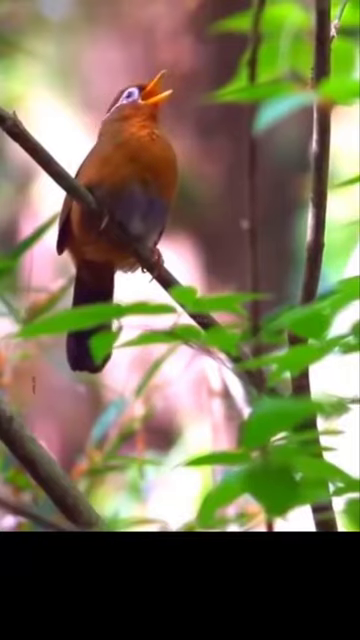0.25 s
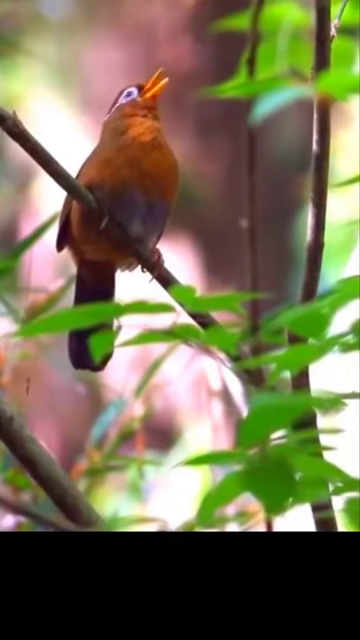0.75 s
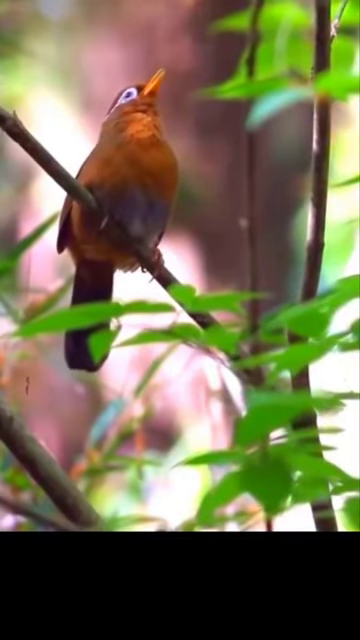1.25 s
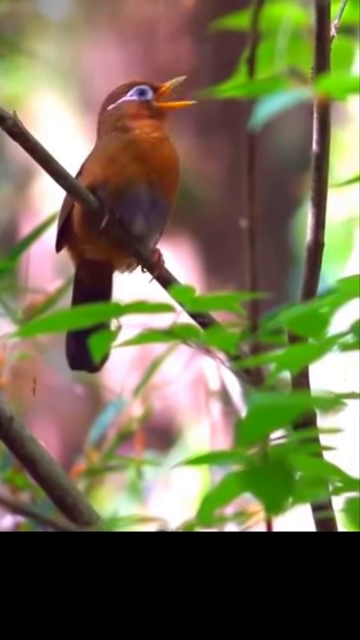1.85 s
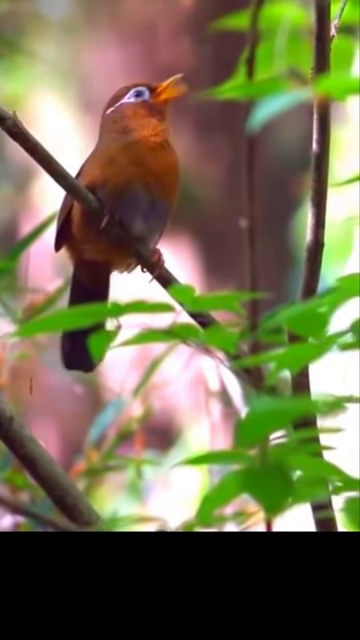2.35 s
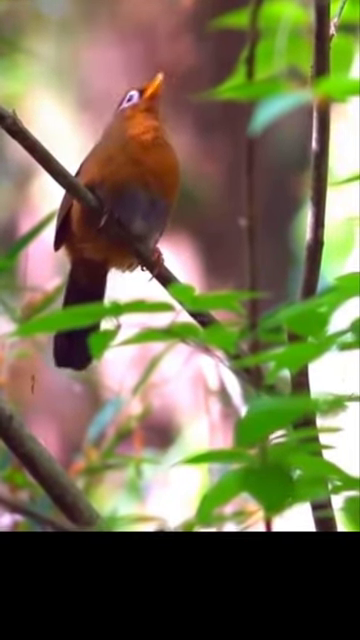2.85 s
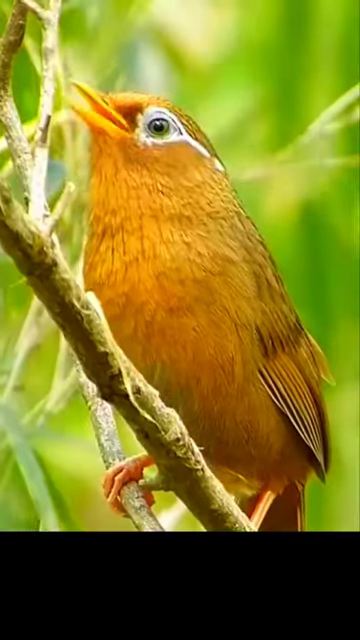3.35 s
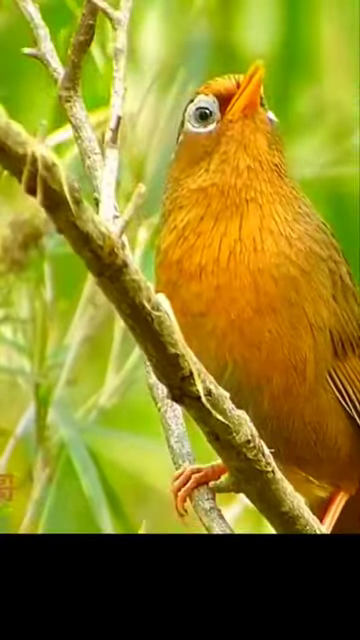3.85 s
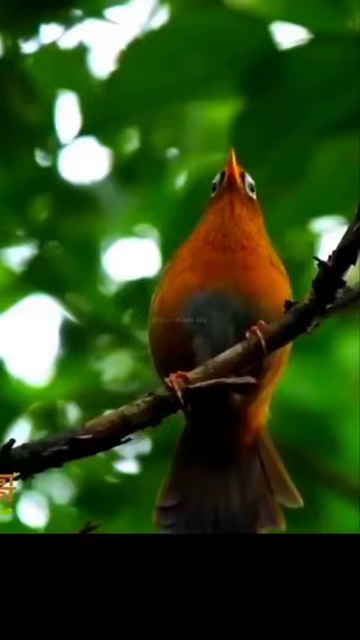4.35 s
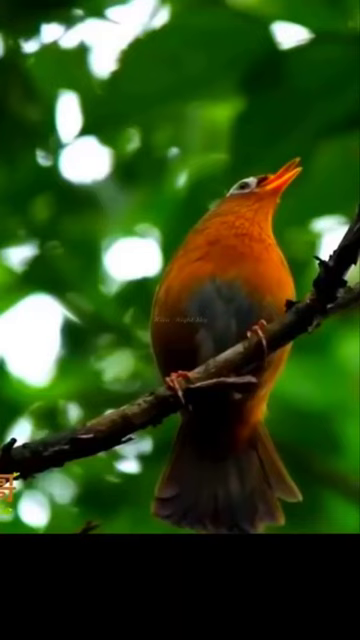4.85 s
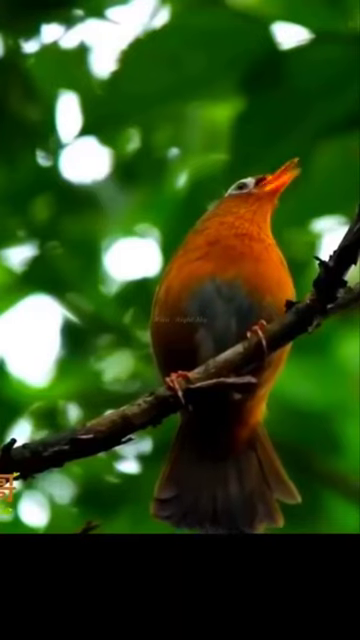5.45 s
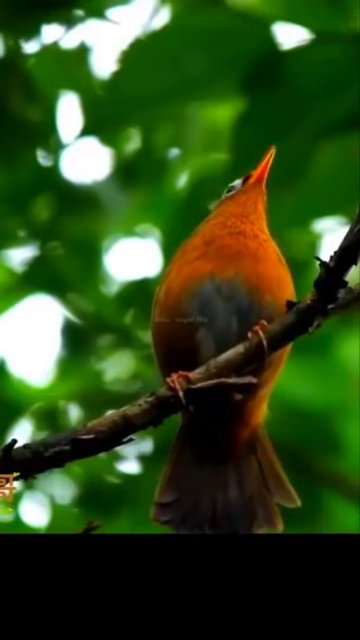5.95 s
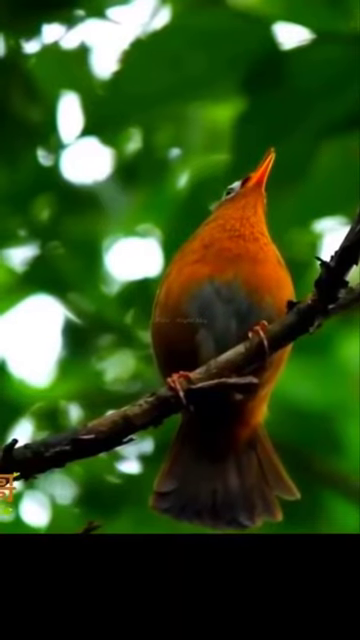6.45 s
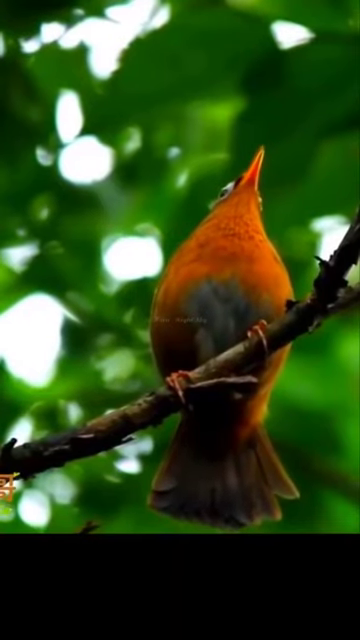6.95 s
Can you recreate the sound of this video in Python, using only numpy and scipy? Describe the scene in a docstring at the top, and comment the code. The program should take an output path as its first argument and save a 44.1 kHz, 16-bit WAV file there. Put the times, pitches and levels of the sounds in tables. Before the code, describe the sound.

Clear rising bird whistles mix with buzzing arched notes, thin to two tiny chips, then resume as rippling slurs and quick warbling chatter among trees.

```python
"""Scooped whistles and buzzy arches open a hwamei's song in a wood, heard from three spots in turn.
Two faint zigzag chips follow and ring on, then falling slurs and warbles, with rattles to close their runs.
Each kind of syllable has its own rule for pitch and level; a near-sine voice, often trilled fast, sings it.
Sparse random echoes make the wood. Behind lie faint clear peeps, soft noise hoots,
far thumps of decaying low rumble, and a hush of shaped background noise."""
import sys
import numpy as np
from scipy import signal
from scipy.fft import rfft, irfft, next_fast_len
from scipy.io import wavfile
from scipy.ndimage import uniform_filter1d

SR = 44100
rng = np.random.default_rng(int(sys.argv[2]) if len(sys.argv) > 2 else 0)


def generate_wav(sig):
    """Save sig (samples, or channels by samples) to the path in sys.argv[1] as 16-bit PCM at SR."""
    pcm = np.round(np.clip(np.atleast_2d(sig).T, -1, 1) * 32767).astype(np.int16)
    wavfile.write(sys.argv[1], SR, pcm)


N = 317079
TIME = np.arange(N) / SR  # s

# when each of the three spots is heard: (from [s], to [s])
SPOTS = [(-.1, 3.2), (3.24, 3.807), (4.43, 7.3)]
# how the throat colours the song at the first and the third spot: (frequency [Hz], gain [dB])
FIRST_COLOUR = [(1000, -55), (1400, -21), (1650, 4), (4400, 1), (4900, -7), (5800, -2), (7200, 6.5),
                (13000, 10.5), (15600, -11.5)]
THIRD_COLOUR = [(1050, -58), (1500, -14.5), (2400, 3.5), (3500, 0), (4200, 2), (5200, -5), (8500, 0),
                (12200, 8), (14000, -3)]


def song():
    """The three stretches of song, each with its own echo; syllable levels are set before echo and colour."""
    whistles = sing(whistle, WHISTLES, WHISTLE_OVERTONES_DB, trill=0.069, trill_hz=119.8, held_hz=2495,
                    jitter=0.008, flutter=5.2, rasp_db=-5.5, rasp_hz=2200, split_db=-24.5)
    buzzes = sing(buzz, BUZZES, BUZZ_OVERTONES_DB, trill=0.078, trill_hz=124.1,
                  jitter=0.0047, flutter=2.4, rasp_db=-8.5, rasp_hz=9000)
    chips = sing(chip, CHIPS, CHIP_OVERTONES_DB, jitter=0.0081)
    slurs = sing(slur, SLURS, SLUR_OVERTONES_DB, trill=0.0092, trill_hz=54.83,
                 jitter=.004, flutter=4.3, split_db=-13.5)
    warbles = sing(warble, WARBLES, WARBLE_OVERTONES_DB, trill=0.012, trill_hz=90.0,
                   jitter=0.0085, flutter=9.4)
    rattles = sing(rattle, RATTLES, WARBLE_OVERTONES_DB, trill=0.085, trill_hz=200.0,
                   held_hz=3030, flutter=1.8)

    # the buzzes get stronger near echoes than the whistles
    first = wood(whistles, near_db=-15, near_t60=.1, far_db=-13.5)
    first += wood(buzzes, near_db=-4.0, near_t60=0.055, far_db=-13.5)
    second = wood(amp(-9.0) * chips, near_db=-4.0, near_t60=0.21, far_db=-16.5)
    phrase = slurs + amp(-0.84) * warbles + amp(-2.5) * rattles
    third = wood(phrase, near_db=-1.5, near_t60=0.13, far_db=-15)

    spots = coloured(first, FIRST_COLOUR), second, coloured(third, THIRD_COLOUR)
    return sum(heard(x, span) for x, span in zip(spots, SPOTS))


SCOOP_S, SCOOP_BEND, SCOOP_ATTACK_S = .05, 1.4, 0.046
SCOOP_START_DB, SCOOP_DB, CATCH_DB, LOCK_S = -18, -8.5, -14, 0.0024
FLICK_S, FLICK_SINK_S, FLICK_FALL_S, FLICK_END_DB = .012, .024, 0.022, -10.5
# overtones 2, 3, .. of the whistles: level against the fundamental, before the note's force [dB]
WHISTLE_OVERTONES_DB = [-30.5, -41.5, -65.5, -54.5, -62.5]
# brief dips in the level of a held note: (time [s], half width [s], depth [dB])
DIPS = [(1.597, .016, -11.5), (1.857, 0.0064, -4.5)]
# whistles: (start [s], held from [s], flick [s], low pitch [Hz], held pitch [Hz],
#            pitch at the end of the hold [Hz], flick pitch [Hz], level [dB], swell over the hold [dB])
WHISTLES = [ (-.04, 0.015, .113, 2015, 2292, 2412, 2908, -29.5, 9.5),
            (0.184, 0.236, .333, 1850, 2418, 2540, 3065, -18.5, 0),
            (0.677, 0.748, .873, 1720, 2450, 2525, 3056, -21, 3.5),
            (.925, 0.989, 1.092, 2100, 2455, 2660, 2988, -18.5, 2),
            (1.448, 1.526, 1.662, 1828, 2387, 2349, 3150, -22.5, 1),
            (1.725, 1.788, 1.929, 1987, 2416, 2473, 3160, -20, 0.5),
            (2.33, 2.423, 2.543, 1954, 2379, 2518, 3350, -23, 4),
            (2.618, 2.714, 2.868, 2032, 2368, 2462, 2635, -23.5, 3.5), ]


def whistle(start, lock, flick, low_hz, held_hz, until_hz, flick_hz, db, swell_db):
    """A soft scoop catches, locks onto a loud held note, drifts in pitch and ends in a flick."""
    end = flick + FLICK_FALL_S
    t = between(start, end)
    scoop = ramp(t, lock, lock - SCOOP_S) ** SCOOP_BEND
    hold = ramp(t, lock, flick)
    hz = held_hz + (low_hz - held_hz) * scoop + (until_hz - held_hz) * hold
    flick_width = np.where(t < flick, FLICK_S, FLICK_SINK_S)
    hz += (flick_hz - until_hz) * np.exp(-abs(t - flick) / flick_width)
    # the level drops at the catch, just before the lock
    times = [start, start + SCOOP_ATTACK_S, lock - 2 * LOCK_S, lock - LOCK_S, lock, flick - FLICK_S, end]
    levels = [SCOOP_START_DB, SCOOP_DB, SCOOP_DB, CATCH_DB, 0, 0, FLICK_END_DB]
    shape = np.interp(t, times, levels)
    dips = sum(depth * np.exp(-((t - s) / width) ** 2) for s, width, depth in DIPS)
    return t, hz, db + swell_db * hold + shape + dips


BUZZ_BEND, BUZZ_START_DB, BUZZ_RELEASE_S, BUZZ_END_DB = 1.8, -5.5, 0.052, -8
BUZZ_LEAD_S, BUZZ_LEAD_DB, BUZZ_ATTACK_S = .02, -20.5, .006  # a faint lead-in before each
# overtones 2, 3, .. of the buzzes: level against the fundamental, before the note's force [dB]
BUZZ_OVERTONES_DB = [-32.5, -35.5, -30.5]
# buzzes: (start [s], crest [s], end [s], start pitch [Hz], crest pitch [Hz], end pitch [Hz], level [dB])
BUZZES = [(0.403, 0.485, .63, 3700, 4090, 2550, -19), (1.161, 1.239, 1.371, 3740, 4186, 2701, -16),
          (2.03, 2.095, 2.25, 3990, 4148, 2875, -19)]


def buzz(start, crest, end, start_hz, crest_hz, end_hz, db):
    """A high arch that grows louder as it bends over and dives, then lets go."""
    t = between(start - BUZZ_LEAD_S, end)
    climb = (start_hz - crest_hz) * ramp(t, crest, start) ** BUZZ_BEND
    dive = (end_hz - crest_hz) * ramp(t, crest, end) ** BUZZ_BEND
    shape = np.interp(t, [start - BUZZ_ATTACK_S, start, end - BUZZ_RELEASE_S, end],
                      [BUZZ_LEAD_DB, BUZZ_START_DB, 0, BUZZ_END_DB])
    return t, crest_hz + climb + dive, db + shape


CHIP_CLIMB_S, CHIP_ATTACK_S, CHIP_RELEASE_S, CHIP_ENDS_DB = 0.014, 0.026, 0.0077, -8
# overtones 2, 3, .. of the chips: level against the fundamental, before the note's force [dB]
CHIP_OVERTONES_DB = [12, -2, -5, -23]
# chips: (start [s], first zig [s], end [s], low pitch [Hz], top pitch [Hz],
#         full zig height [Hz], zig period [s], level before the song's trim [dB])
CHIPS = [(3.503, 3.529, 3.596, 1400, 2050, 800, .02, -43),
         (3.752, 3.783, 3.806, 1520, 1900, 600, .015, -40.5)]


def chip(start, first_zig, end, low_hz, top_hz, zig_hz, period, db):
    """A quick climb that breaks into a growing zigzag."""
    t = between(start, end)
    turns = np.maximum((t - first_zig) / period + .5, 0)
    zigzag = (1 - abs(2 * (turns % 1) - 1)) ** 2 * np.sqrt(ramp(t, start, end))
    hz = top_hz + (low_hz - top_hz) * np.exp((start - t) / CHIP_CLIMB_S) + zig_hz * zigzag
    ends = ramp(t, start + CHIP_ATTACK_S, start) + ramp(t, end - CHIP_RELEASE_S, end)
    return t, hz, db + CHIP_ENDS_DB * ends


CROAK_HZ, CROAK_END_HZ, CROAK_START_DB, CROAK_DB = 1519, 1780, -14.5, -8  # the low reedy opening
SLUR_BEND, RIPPLE_SLOWING_S = 1.5, 0.1185
SLUR_FADE_DB, SLUR_RELEASE_S, SLUR_END_DB = -6.5, 0.034, -17.5
# overtones 2, 3, .. of the slurs: level against the fundamental, before the note's force [dB]
SLUR_OVERTONES_DB = [-27, -37, -42, -60, -52.5]
# slurs: (start [s], climb from [s], climb to [s], crest [s], end [s], top pitch [Hz], end pitch [Hz],
#         ripple height [Hz], ripple period at the crest [s], ripple fade [s], level [dB])
SLURS = [(4.49, 4.525, 4.562, 4.604, 4.787, 3030, 2380, 600, .039, .045, -23.5),
         (4.892, 4.931, 4.983, 5.006, 5.217, 2900, 2360, 370, .044, .13, -20.5),
         (5.499, 5.536, 5.595, 5.618, 5.87, 3000, 2380, 660, .037, .05, -19)]


def slur(start, climb, top, crest, end, top_hz, end_hz, ripple_hz, period, fade_s, db):
    """A low croak leaps up, ripples ever more slowly around its crest, and sinks."""
    t = between(start, end)
    hz = np.interp(t, [start, climb, top], [CROAK_HZ, CROAK_END_HZ, top_hz])
    hz += (end_hz - top_hz) * ramp(t, top, end) ** SLUR_BEND
    # a logarithmic clock stretches each ripple longer than the last
    clock = np.log(np.maximum(1 + (t - crest) / RIPPLE_SLOWING_S, 1e-3))
    turns = clock * RIPPLE_SLOWING_S / period
    ripple_depth = np.exp(-abs(t - crest) / fade_s) * ramp(t, climb, top) ** 2
    hz += ripple_hz * np.cos(np.pi * turns) ** 2 * ripple_depth
    shape = np.interp(t, [start, climb, top, crest, end - SLUR_RELEASE_S, end],
                      [CROAK_START_DB, CROAK_DB, SLUR_FADE_DB, 0, SLUR_FADE_DB, SLUR_END_DB])
    return t, hz, db + shape


WARBLE_ARCH_S, WARBLE_START_DB, WARBLE_RELEASE_S, WARBLE_END_DB = 0.0231, -16, 0.019, -14
# overtones 2, 3, .. of warbles and rattles: level against the fundamental, before the note's force [dB]
WARBLE_OVERTONES_DB = [-29, -30, -41.5, -49.5]
# warble notes: (start [s], loudest [s], crest [s], end [s], low pitch [Hz], crest pitch [Hz],
#                level before the song's trim [dB])
WARBLES = [ (6.11, 6.15, 6.149, 6.176, 2626, 2964, -18.5), (6.174, 6.215, 6.231, 6.236, 2494, 2860, -18.5),
           (6.249, 6.28, 6.307, 6.316, 2555, 3112, -20), (6.329, 6.347, 6.376, 6.392, 2554, 2850, -21),
           (6.412, 6.458, 6.465, 6.485, 2544, 2720, -19), (6.736, 6.79, 6.784, 6.814, 2625, 2910, -19.5),
           (6.83, 6.863, 6.88, 6.903, 2583, 2970, -18.5), (6.904, 6.927, 6.929, 6.98, 2660, 2752, -22),
           (6.975, 7.009, 7.011, 7.027, 2573, 2632, -16.5), ]


def warble(start, loudest, crest, end, low_hz, crest_hz, db):
    """A short note that swells into one round hump of pitch."""
    t = between(start, end)
    hz = low_hz + (crest_hz - low_hz) * np.exp(-((t - crest) / WARBLE_ARCH_S) ** 2)
    attack = WARBLE_START_DB * ramp(t, loudest, start)
    release = WARBLE_END_DB * ramp(t, end - WARBLE_RELEASE_S, end)
    return t, hz, db + attack + release


RATTLE_SAG_HZ, RATTLE_EDGE_S, RATTLE_ENDS_DB = 200.7, 0.014, -3.5
# rattles: (start [s], end [s], start pitch [Hz], end pitch [Hz], level before the song's trim [dB])
RATTLES = [(6.47, 6.608, 2549, 2556, -25.5), (7.012, 7.149, 2480, 2357, -26)]


def rattle(start, end, start_hz, end_hz, db):
    """An even note whose pitch sags in the middle."""
    t = between(start, end)
    along = ramp(t, start, end)
    hz = start_hz + (end_hz - start_hz) * along - RATTLE_SAG_HZ * np.sin(np.pi * along)
    ends = ramp(t, start + RATTLE_EDGE_S, start) + ramp(t, end - RATTLE_EDGE_S, end)
    return t, hz, db + RATTLE_ENDS_DB * ends


def sing(rule, rows, overtones_db=(), trill=0, trill_hz=0, held_hz=0, jitter=0, flutter=0,
         rasp_db=-np.inf, rasp_hz=SR, split_db=-np.inf):
    """A run of syllables of one kind; its rule turns each row into times, pitch and level."""
    out = np.zeros(N)
    for row in rows:
        start, sound = syllable(rule(*row), overtones_db, trill, trill_hz, held_hz, jitter, flutter,
                                rasp_db, rasp_hz, split_db)
        add(out, start, sound)
    return out


def syllable(gesture, overtones_db, trill, trill_hz, held_hz, jitter, flutter, rasp_db, rasp_hz, split_db):
    """The syrinx: a near-sine whose pitch and strength a fast trill shakes."""
    t, pitch, level_db = gesture
    hz, gain = (uniform_filter1d(c, size=100) for c in (pitch, amp(level_db)))
    # the trill (a share of the pitch) dies away when the voice settles on its held note
    depth = trill * np.clip((abs(hz - held_hz) - 110) / 400, 0, 1)
    low = np.clip((2100 - hz) / 350, 0, 1)
    trill_rate = trill_hz * (1 + .13 * wander(len(t), 66))
    beat = 2 * np.pi * (np.cumsum(trill_rate) / SR + rng.random())
    swing = np.sin(beat) + np.cos(2 * beat) / 4  # round tops, sharp dips
    # the deeper the trill, the less steady the pitch
    unsteady = (jitter + .14 * depth) * wander(len(t), 400)
    hz = hz * (1 + depth * swing + unsteady)
    phase = 2 * np.pi * np.cumsum(hz) / SR
    tone = np.sin(phase)
    # overtones grow with the force of the note
    force = (gain / np.sqrt(np.mean(gain ** 2))) ** .6
    for harmonic, db in enumerate(overtones_db, start=2):
        strength = force * amp(db + 3.5 * wander(len(t), 45))
        tone += strength * np.sin(harmonic * phase) * (harmonic * hz < SR / 2)
    # the lowest notes turn reedy: the octave comes out, and the fifth between it and the fundamental
    tone += amp(split_db) * low * (np.sin(2 * phase) + 0.58 * np.sin(1.5 * phase))
    rasp = amp(rasp_db) * depth * wander(len(t), rasp_hz) * np.sin(phase)
    gain = gain * (1 + flutter * depth * np.sin(beat + .5))
    soft_ends = signal.windows.tukey(len(t), min(1, .008 * SR / len(t)))
    return t[0], gain * (tone + rasp) * soft_ends


# how long the far trunks ring: (frequency [Hz], time to fall 60 dB [s])
WOOD_T60 = [(500, 0.25), (2500, 0.62), (4000, 0.71), (8000, 0.61), (14000, 0.43)]


def wood(x, near_db, near_t60, far_db):
    """Nearby branches scatter the song at once; far trunks give a long tail."""
    t = np.arange(SR) / SR
    # about 3000 echoes a second, of random sign
    near, far = rng.choice([-1., 1.], (2, SR)) * (rng.random((2, SR)) < 3000 / SR)
    near = near * (t > .003) * amp(-60 * t / near_t60)
    far = far * np.clip((t - .01) / 0.033, 0, 1)
    # each frequency of the far tail dies at its own pace
    hz, when, z = signal.stft(far, SR, nperseg=256)
    decay = amp(-60 * when / read(WOOD_T60, hz)[:, None])
    far = signal.istft(z * decay, SR, nperseg=256)[1][:SR]
    echoes = amp(near_db) * near / np.linalg.norm(near) + amp(far_db) * far / np.linalg.norm(far)
    return x + signal.fftconvolve(x, echoes)[:N]


def heard(x, span):
    """A sound for as long as its spot is heard, with short fades."""
    is_open = 1. * ((TIME > span[0]) & (TIME < span[1]))
    return x * uniform_filter1d(is_open, size=300)


# the last chip's ring and faint clear peeps: (start [s], end [s], start pitch [Hz], end pitch [Hz],
#                                              level before echo and trim [dB], fade [dB])
CHIP_RINGS = [(3.808, 3.88, 2100, 2280, -39, -22), (3.9, 4.38, 2180, 2120, -72, -9),
              (3.81, 4.33, 3620, 3660, -66, -7)]
PEEPS = [(3.923, 3.955, 7710, 7540, -74, -2.5), (4.025, 4.06, 3860, 4010, -57, -15)]


def chip_rings_and_peeps():
    """The last chip's ring dying away in the wood, near 2.2 and 3.6 kHz, and two faint peeps, all echoed."""
    notes = sing(glide, CHIP_RINGS, trill=0.094, trill_hz=178, flutter=5.5)
    notes += sing(glide, PEEPS, jitter=0.0037)
    return amp(-6) * wood(notes, near_db=1, near_t60=0.43, far_db=-9)


def glide(start, end, start_hz, end_hz, db, fade_db):
    """A straight, fading glide."""
    t = between(start, end)
    along = ramp(t, start, end)
    return t, start_hz + (end_hz - start_hz) * along, db + fade_db * along


HOOT_S, HOOT_ENDS_DB = .1, -26  # from the middle to each end
# faint soft hoots of noise: (middle [s], level [dB])
HOOTS = [(2.99, -73), (5.74, -66)]


def hoots():
    """Brief soft swells in the humming band of the hush."""
    out = np.zeros(N)
    for s, db in HOOTS:
        swell = [(s - HOOT_S, db + HOOT_ENDS_DB), (s, db), (s + HOOT_S, db + HOOT_ENDS_DB)]
        out += hush(HUM_HUSH, swell)
    return out


# far thumps: (time [s], level [dB], pitch [Hz], time to fall 60 dB [s])
THUMPS = [(.791, -47.5, 145, 0.11), (0.836, -52.5, 138, 0.15), (.885, -54, 143.6, 0.12),
          (.9, -55.5, 74, 0.14), (1.045, -55, 72, 0.16), (1.171, -60.5, 148, 0.21),
          (1.214, -50.5, 100, 0.062), (2.31, -73.5, 360, 0.071)]


def thumps():
    """Dull far knocks: short bursts of low rumble that die away exponentially."""
    out, t = np.zeros(N), np.arange(SR // 2) / SR
    for s, db, hz, t60 in THUMPS:
        turn = 2 * np.pi * hz * t
        rumble = np.sin(turn) + .7 * wander(len(t), 45) * np.cos(turn)
        attack = 1 - np.exp(-t / .003)
        add(out, s, amp(db - 60 * t / t60) * evened(rumble) * attack)
    return out


# spectra of the hush, each set to rms 1 before its level: (frequency [Hz], relative density [dB per Hz])
LOW_HUSH = [(60, -16.5), (280, -28.5), (480, -4.5), (1400, 3), (2500, -4.5), (12000, -13.5)]
MID_HUSH = [(1150, -55), (1450, -20), (1750, -3), (2500, 0), (3400, -1), (4400, -6), (4900, -34),
            (7500, -25), (15000, -38)]
HUM_HUSH = [(300, -25), (520, -6), (680, 1), (820, -5), (1200, -37)]
SECOND_HUSH = [(18, -47), (30, -19), (364, -4.5), (437, -5), (485, -3.5), (859, -3), (1730, -13.5),
               (2490, -16), (4650, -11), (6530, -6), (11900, -23.5), (15000, -51)]
THIRD_HUSH = [(30, -9.5), (100, -3), (200, -5.5), (400, -1), (700, -9), (1300, -3), (3000, -11),
              (6000, -17), (10000, -27.5), (15000, -34.5)]
# the course of each hush: (time [s], level [dB])
LOW_HUSH_DB = [(0, -52), (.4, -88), (0.428, -54), (0.649, -55), (1.1, -59.5), (1.447, -87.5), (3.201, -99)]
MID_HUSH_DB = [(0, -48), (3.188, -58.5), (3.209, -83.5), (4.431, -104.5), (4.45, -64), (5.4, -58),
               (6.252, -54), (6.4, -70.5), (7.19, -67.5)]
HUM_HUSH_DB = [(4.432, -62), (5.35, -52.5), (5.5, -66.5), (5.62, -95), (6.5, -100)]
SECOND_HUSH_DB = [(3.235, -98), (3.25, -57), (3.801, -56.5), (3.84, -102), (4.43, -96)]
THIRD_HUSH_DB = [(4.428, -81), (4.442, -54), (5.229, -52.5), (5.35, -58), (5.45, -95.5), (7.19, -96.5)]


def hush(spectrum, levels):
    """Soft shaped background noise whose level follows a table."""
    s, db = np.transpose(levels)
    noise = evened(coloured(rng.standard_normal(N), spectrum))
    is_on = (TIME >= s[0]) & (TIME <= s[-1])
    return noise * amp(np.interp(TIME, s, db)) * is_on


def coloured(x, spectrum):
    """Filters by a table of (frequency [Hz], gain [dB])."""
    size = next_fast_len(N + SR // 2)
    gain = amp(read(spectrum, np.fft.rfftfreq(size, 1 / SR)))
    return irfft(rfft(x, size) * gain, size)[:N]


def wander(count, hz):
    """Smooth chance, of rms 1 over a second, that thins out above hz."""
    f = np.fft.rfftfreq(SR, 1 / SR)
    smooth = rfft(rng.standard_normal(SR)) * np.exp(-(f / hz) ** 2)
    return evened(irfft(smooth, SR))[:count]


def amp(db):
    """Decibels to gain."""
    return 10 ** (np.asarray(db) / 20)


def evened(x):
    """Scales to rms 1."""
    return x / np.sqrt(np.mean(x ** 2) + 1e-20)


def read(points, hz):
    """Reads a table on a log-frequency axis."""
    f, value = np.transpose(points)
    return np.interp(np.log(hz + 1), np.log(f + 1), value)


def between(start, end):
    """The sample times from start to end."""
    return TIME[(TIME >= start) & (TIME < end)]


def ramp(t, start, end):
    """Goes from 0 at start to 1 at end, flat outside."""
    return np.clip((t - start) / (end - start), 0, 1)


def add(mix, s, sound):
    """Mixes a sound in at time s."""
    part = mix[max(0, round(s * SR)):][:len(sound)]
    part += sound[:len(part)]


def scene():
    """Song, chip rings and peeps, hoots, thumps and hush."""
    noise = hush(LOW_HUSH, LOW_HUSH_DB) + hush(MID_HUSH, MID_HUSH_DB) + hush(HUM_HUSH, HUM_HUSH_DB)
    noise += hush(SECOND_HUSH, SECOND_HUSH_DB) + hush(THIRD_HUSH, THIRD_HUSH_DB)
    return (song() + chip_rings_and_peeps() + hoots() + thumps() + noise)[None]


EDGE_HZ = 15650


def record(dry):
    """The band limit: a steep linear-phase low-pass."""
    low_pass = signal.firwin(511, EDGE_HZ, window=("kaiser", 9), fs=SR)
    return signal.oaconvolve(dry, low_pass[None], "same")


dry = scene()
out = record(dry)
generate_wav(out)
```